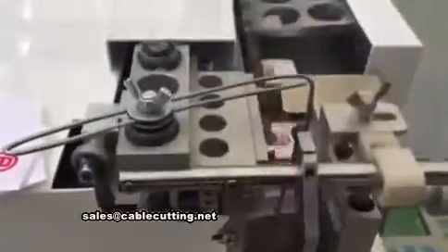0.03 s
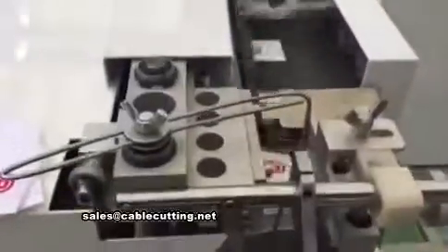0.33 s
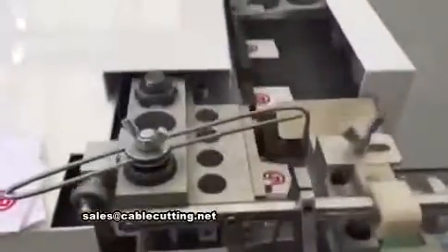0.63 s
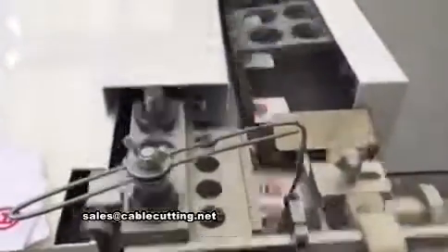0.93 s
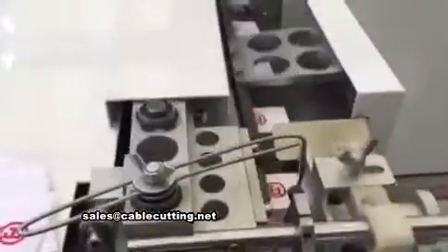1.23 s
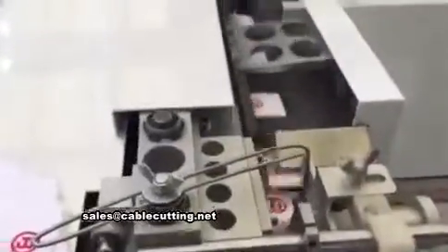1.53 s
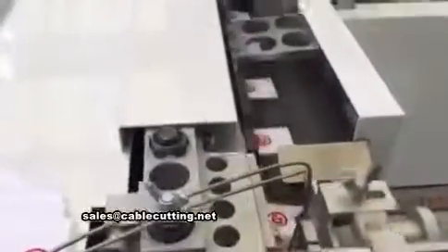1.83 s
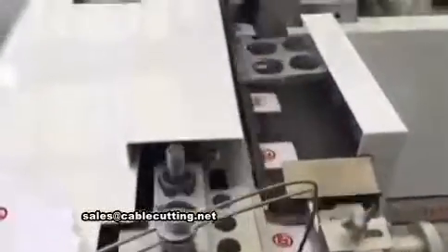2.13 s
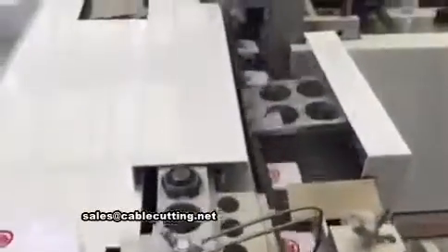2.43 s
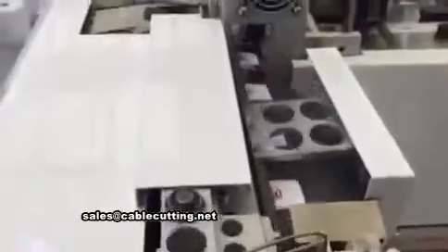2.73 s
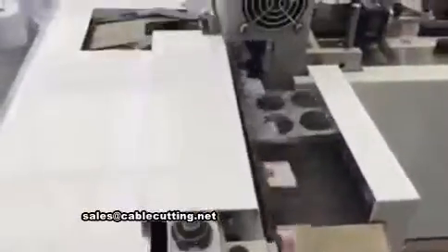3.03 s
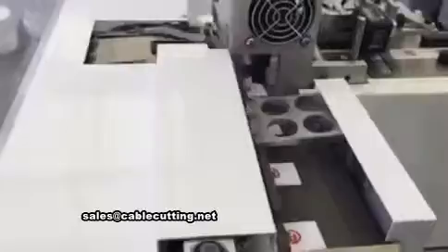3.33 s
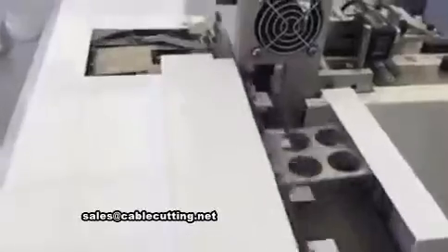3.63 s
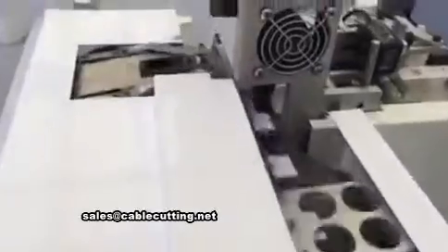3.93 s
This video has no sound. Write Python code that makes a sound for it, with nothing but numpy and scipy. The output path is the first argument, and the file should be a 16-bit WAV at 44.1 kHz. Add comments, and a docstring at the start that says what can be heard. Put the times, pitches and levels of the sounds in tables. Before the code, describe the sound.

Close to the microphone in a workshop, the motors of a label cutting and folding machine buzz and chatter unevenly over a soft fan. Moving parts knock, clack and scrape throughout, and one ringing steel clink comes late.

```python
"""The buzzing motors of a label cutting and folding machine, close up, swell in quick uneven surges.
Two motor tones beat against each other while loose metal rattles and chatters along with them.
Strokes thud and knock on the frame, cutter and folder clack, sliding parts and ribbon scrape, links tick.
Late on, a metal part pings faintly, then steel clinks on steel and rings on.
A fan rushes underneath, and a short workshop tail sits behind the hits."""
import sys
import numpy as np
from scipy import signal
from scipy.fft import rfft, irfft
from scipy.io import wavfile
from scipy.ndimage import uniform_filter1d

SR = 44100
rng = np.random.default_rng(int(sys.argv[2]) if len(sys.argv) > 2 else 0)


def transcribe(signal):
    """Save signal, clipped to [-1, 1], as a 16-bit WAV file at the path in sys.argv[1]."""
    frames = np.atleast_2d(signal).T
    limited = np.clip(frames, -1, 1)
    pcm = np.round(limited * 32767).astype(np.int16)
    wavfile.write(sys.argv[1], SR, pcm)


N = 176400
T = np.arange(N) / SR

# Table levels are relative: each layer's gains apply on top.
# motor surges (centre [s], length [s], fundamental level [dB], overtone level [dB])
MOTOR_SURGES = [(0.008, 0.021, -21, -15.5), (0.072, 0.06, -23, -15.5), (0.093, 0.0055, -17, -6.5),
                (0.114, 0.014, -20, -10), (0.172, 0.074, -19, -17.5), (0.243, 0.038, -20.5, -20),
                (0.273, 0.051, -14.5, -20.5), (0.304, 0.0092, -9, -13), (0.318, 0.013, -9, -13),
                (0.364, 0.054, -9.5, -18), (0.435, 0.085, -12.5, -17), (0.498, 0.064, -15.5, -23),
                (0.499, 0.012, -22, -17), (0.556, 0.012, -12.5, -28), (0.59, 0.075, -14, -22.5),
                (0.697, 0.022, -10.5, -36), (0.701, 0.12, -20, -24), (0.758, 0.061, -13.5, -33),
                (0.826, 0.068, -15.5, -19), (0.885, 0.058, -18.5, -39), (0.974, 0.07, -12, -23),
                (1.047, 0.043, -15.5, -25.5), (1.109, 0.054, -22, -16), (1.124, 0.01, -9, -28),
                (1.164, 0.016, -19.5, -20), (1.206, 0.08, -22, -19), (1.294, 0.055, -19, -28.5),
                (1.37, 0.053, -13.5, -24), (1.446, 0.07, -15.5, -24.5), (1.503, 0.027, -21, -17.5),
                (1.57, 0.083, -15.5, -16.5), (1.65, 0.015, -13, -16), (1.685, 0.046, -11, -22),
                (1.725, 0.016, -16, -16.5), (1.85, 0.017, -16, -18), (1.901, 0.018, -13, -14.5),
                (1.906, 0.071, -20, -21.5), (1.971, 0.04, -34, -16), (2.04, 0.021, -9.5, -13.5),
                (2.064, 0.064, -11.5, -24), (2.088, 0.016, -8, -32), (2.132, 0.075, -16, -31),
                (2.137, 0.011, -25, -15.5), (2.231, 0.033, -15, -19.5), (2.289, 0.071, -21.5, -27),
                (2.319, 0.025, -16, -10.5), (2.425, 0.025, -24, -13), (2.476, 0.0092, -16.5, -20),
                (2.515, 0.054, -18.5, -21.5), (2.603, 0.056, -15.5, -13.5), (2.659, 0.0096, -14.5, -23),
                (2.7, 0.034, -18, -15.5), (2.74, 0.011, -12.5, -19), (2.847, 0.067, -7, -14),
                (2.913, 0.055, -13, -15.5), (2.973, 0.079, -7.5, -15.5), (3.046, 0.047, -15, -19),
                (3.098, 0.056, -19, -22.5), (3.178, 0.059, -15, -20), (3.225, 0.061, -11.5, -16.5),
                (3.29, 0.071, -20, -20.5), (3.354, 0.044, -13, -16), (3.481, 0.013, -18, -15),
                (3.576, 0.011, -23, -11.5), (3.611, 0.039, -11.5, -19), (3.772, 0.034, -19.5, -18),
                (3.812, 0.033, -11.5, -19), (3.877, 0.052, -19.5, -19.5), (3.967, 0.011, -15, -8.5)]
# main motor's harmonics, from the second up (level [dB])
MAIN_OVERTONES = [-2.5, -6.5, -11.5, -15, -22.5, -24.5, -27]
# second motor's harmonics, from the second up (level [dB])
SECOND_OVERTONES = [-7.5, -16, -20.5]
# tone colour of the loose metal's chatter (frequency [Hz], level [dB])
CHATTER_SPECTRUM = [(130, 3), (300, -11), (550, 9), (750, -8.5), (1080, -1), (1330, -14), (1620, -1.5),
                    (2000, -15), (3200, -14.5), (4600, -22.5), (9000, -30), (15000, -46)]
# thuds of the moving parts (centre [s], length [s], level [dB])
STROKE_THUDS = [(0.03, 0.04, -20.5), (0.15, 0.11, -21.5), (0.327, 0.1, -23.5), (0.414, 0.11, -22),
                (0.498, 0.15, -26.5), (0.584, 0.26, -31), (0.73, 0.051, -24), (0.785, 0.077, -25),
                (0.894, 0.058, -29.5), (0.965, 0.042, -25.5), (1.19, 0.14, -26), (1.28, 0.12, -27),
                (1.478, 0.036, -21.5), (1.575, 0.12, -22.5), (1.692, 0.051, -22.5), (1.846, 0.022, -20),
                (1.894, 0.056, -28), (1.962, 0.076, -27), (2.036, 0.0097, -26), (2.09, 0.025, -23),
                (2.232, 0.039, -23), (2.614, 0.07, -31), (2.714, 0.053, -25), (2.829, 0.14, -29),
                (3.012, 0.066, -21), (3.11, 0.04, -24.5), (3.316, 0.021, -25.5), (3.612, 0.041, -21.5),
                (3.777, 0.034, -16), (3.821, 0.056, -28.5), (3.879, 0.036, -22)]
# bassy colour of a thud (frequency [Hz], level [dB])
THUD_SPECTRUM = [(22, -42), (40, -10.5), (68, 3), (100, -5), (150, -14), (250, -13.5), (400, -17),
                 (1500, -49)]
# heavy knocks on the frame (time [s], level [dB])
FRAME_KNOCKS = [(0.003, -5.5), (0.053, -12), (0.078, -17), (0.298, -12), (0.343, -17), (0.773, -15.5),
                (1.092, -20), (1.243, -16), (2.999, -14), (3.087, -15), (3.385, -16), (3.771, -21.5)]
# low modes of the frame (frequency [Hz], level [dB], T60 [s])
FRAME_MODES = [(71, 0, .15), (98, -5, .1), (170, -11, .05)]
# clacks of the cutter and folder (time [s], body level [dB], top level [dB])
CUTTER_CLACKS = [(0.001, -14.5, -15), (0.07, -14.5, -26), (0.0927, -35, -32), (0.162, -17.5, -31),
                 (0.188, -24, -31), (0.5479, -19.5, -26), (0.865, -22, -28), (0.8915, -15, -23),
                 (1.4501, -16.5, -25), (1.6851, -17, -18.5), (3.024, -15.5, -23), (3.043, -18.5, -23),
                 (3.2163, -18.5, -20), (3.3955, -18, -17), (3.8575, -16, -22.5)]
# short scrapes (centre [s], length [s], body level [dB], top level [dB])
SLIDE_SCRAPES = [(0.02, 0.013, -13.5, -19), (0.038, 0.018, -17.5, -25), (0.113, 0.06, -29, -39),
                 (0.33, 0.021, -19, -28), (0.376, 0.021, -20, -30), (0.404, 0.014, -21.5, -25),
                 (0.404, 0.035, -25.5, -47), (0.508, 0.012, -22, -31), (0.678, 0.018, -20.5, -25),
                 (0.707, 0.038, -23.5, -28.5), (0.762, 0.014, -19, -26), (0.783, 0.04, -22.5, -31),
                 (0.84, 0.018, -24.5, -27.5), (1.074, 0.034, -24, -28.5), (1.143, 0.055, -23.5, -30.5),
                 (1.215, 0.048, -29, -47), (1.28, 0.015, -24, -31), (1.924, 0.047, -23, -27),
                 (1.939, 0.028, -24.5, -28), (2.229, 0.01, -27, -40), (2.615, 0.012, -25, -27),
                 (2.96, 0.064, -25.5, -32), (3.231, 0.016, -24.5, -25), (3.322, 0.045, -22.5, -28.5),
                 (3.867, 0.018, -27, -42)]
# midrange body of scrapes, clacks and ticks (frequency [Hz], level [dB])
BODY_SPECTRUM = [(300, -25), (900, 5), (2000, 4.5), (3300, 1.5), (5000, -4), (6500, -4), (9000, -19),
                 (15000, -20)]
# their bright top end (frequency [Hz], level [dB])
TOP_SPECTRUM = [(300, -44), (4500, -17), (7500, -3), (9300, 4), (10500, -6), (12000, -0.5), (15000, -6.5)]
# ringing modes of the steel part (frequency [Hz], level [dB], T60 [s])
STEEL_MODES = [(2681, -11, .3), (3612, -12, .4), (3652, -8, .9), (4707, -13, .7), (4734, -7, 1.25),
               (4818, -17, 1), (5577, -8.5, .45), (5640, -6.5, 1.2), (5689, -12, .8), (6869, -12, .45),
               (6912, -12, .9), (8390, -16, .35), (8712, -10.5, 1.1), (11410, -9, .3), (11600, -10, .35),
               (12040, -13, .3)]
# bright crack that opens the clink (frequency [Hz], level [dB])
CRACK_SPECTRUM = [(1000, -1), (2500, 0), (4500, 4), (5500, 3), (7500, -5), (8600, 2), (10300, -21),
                  (11400, 5), (12700, -6), (15000, -11)]
# modes of the lightly touched part (frequency [Hz], level [dB])
PING_MODES = [(3677, -38), (6950, -43), (8355, -44)]
# colour of the fan's air (frequency [Hz], level [dB])
FAN_SPECTRUM = [(20, 3), (70, 3.5), (300, -2.5), (1100, 3.5), (2400, -3), (5000, -14), (8000, -17),
                (10500, -20.5), (15000, -21.5)]
# fader ride on the fan's air (time [s], level [dB])
FAN_RIDE = [(0, -30), (2.3, -29.5), (2.9, -29), (4, -28.5)]

TOP_DB = -6.5  # top-end trim on scrapes and clacks


def buzz():
    """Two motor tones beat and swell in surges; loose metal rattles with them and adds overtones."""
    main_hz, second_hz, rattle_hz, flutter_hz = 545, 533.6, 48, 70.5
    # between surges the buzz settles to an idle floor
    tone_env = np.hypot(swells(MOTOR_SURGES, column=2, edge=2.85), amp(-35))
    over_env = np.hypot(swells(MOTOR_SURGES, column=3, edge=2.85), amp(-31.5))
    upper_env = over_env ** 0.9 * amp(-32) ** 0.1  # higher overtones swell less
    main, second = motor_phase(main_hz), motor_phase(second_hz)
    rattle = np.cos(2 * np.pi * rattle_hz * T + 2 * waver(22))
    tone = amp(-1) * tone_env * unit(1 + .2 * rattle) * np.cos(main + .25 * waver(79))
    overtones = np.zeros(N)
    for phase, levels in ((main, MAIN_OVERTONES), (second, SECOND_OVERTONES)):
        for k, db in enumerate(levels, 2):
            gain = amp(db) * (over_env if k < 4 else upper_env) * flutter(2.7, flutter_hz)
            overtones += gain * np.cos(k * phase + 2 * np.pi * rng.random() + .25 * waver(64))
    chatter_env = amp(-6) * np.hypot(over_env, 0.41 * tone_env)
    chatter = chatter_env * noise(CHATTER_SPECTRUM) * unit(1 + 0.44 * np.cos(main))
    rasp = unit(1 + .27 * rattle) * (overtones + chatter)
    return flutter(1.5, flutter_hz) * (tone + rasp)


def motor_phase(hz):
    """A motor's running phase, with slow pitch drift and fast jitter."""
    cycles = np.cumsum(hz * (1 + .0015 * waver(6.16))) / SR
    return 2 * np.pi * (cycles + .009 * waver(105))


def thuds():
    """Each stroke shakes the frame with a dull, even-bodied rumble."""
    rumble = noise(THUD_SPECTRUM)
    levelled = unit(rumble / np.sqrt(uniform_filter1d(rumble ** 2, size=900) + 0.031))
    return swells(STROKE_THUDS, column=2, edge=1.6) * levelled * flutter(2.6, 31)


def knocks(attack_s=.006):
    """A heavy part lands and the frame booms briefly in its lowest modes."""
    out = np.zeros(N)
    for start, level_db in FRAME_KNOCKS:
        t = np.maximum(T - start, 0)
        boom = sum(amp(db - 60 * t / t60) * np.sin(2 * np.pi * hz * rng.uniform(.9, 1.1) * t)
                   for hz, db, t60 in FRAME_MODES)
        out += amp(level_db) * np.minimum(t / attack_s, 1) * boom
    return out


def clacks(t60_s=0.031):
    """Metal meets metal and stops dead: an instant attack and a very tight decay."""
    body, top = noise(BODY_SPECTRUM), noise(TOP_SPECTRUM)
    out = np.zeros(N)
    for start, body_db, top_db in CUTTER_CLACKS:
        after = slice(int(start * SR), None)
        decay = amp(-60 * (T[after] - start) / t60_s)
        out[after] += decay * (amp(body_db) * body[after] + amp(top_db + TOP_DB) * top[after])
    return out


def scrapes(slips_per_s=260):
    """Sliding parts and ribbon catch and slip: short, gritty scrapes made of crowded ticks."""
    slips = tails(rng.random(N) < slips_per_s / SR, decay_s=0.0009)
    body = amp(1) * swells(SLIDE_SCRAPES, column=2, edge=2.16) * noise(BODY_SPECTRUM)
    top = amp(TOP_DB) * swells(SLIDE_SCRAPES, column=3, edge=6.2) * noise(TOP_SPECTRUM)
    return (body + top) * flutter(-2.5, 500) * unit(1 + 2.6 * slips)


def clink(start_s=3.364, beat_hz=8.9, bite_t60_s=.13, crack_t60_s=.1):
    """Steel strikes steel: a crack, a loud bite that soon dies, then modes beating with their twins."""
    t = np.maximum(T - start_s, 0)
    ring = np.zeros(N)
    for hz, db, t60 in STEEL_MODES:
        shimmer = amp(db - 60 * t / t60) * flutter(2, 81)
        ring += shimmer * np.sin(2 * np.pi * (hz * t + rng.random()) + .25 * waver(64))
    beating = 1 + .45 * np.cos(2 * np.pi * beat_hz * t)
    bite = 1 + amp(6.5 - 60 * t / bite_t60_s)
    crack = noise(CRACK_SPECTRUM) * amp(14 - 60 * t / crack_t60_s)
    attack = np.minimum(t / 0.00084, 1)
    return amp(-24.5) * attack * (ring * beating * bite + crack)


def ping(start_s=2.706, t60_s=.7):
    """A lightly touched metal part rings faintly."""
    t = np.maximum(T - start_s, 0)
    return sum(amp(db - 60 * t / t60_s) * np.sin(2 * np.pi * hz * t) for hz, db in PING_MODES)


def ticks(ticks_per_s=26):
    """Small links tick at random behind the louder strokes."""
    accents = amp(3.5 * np.minimum(rng.exponential(1, N), 3))
    triggers = rng.random(N) < ticks_per_s / SR
    envelope = tails(accents * triggers, decay_s=0.0018)
    return amp(-36) * envelope * (noise(BODY_SPECTRUM) + 0.36 * noise(TOP_SPECTRUM))


def fan(blade_hz=790.5):
    """A steady bed of rushing air with a faint blade tone."""
    rush = amp(np.interp(T, *np.transpose(FAN_RIDE))) * noise(FAN_SPECTRUM) * flutter(0.93, 82)
    blade = unit(np.cos(2 * np.pi * blade_hz * T + .5 * waver(5.5)))
    return rush + amp(-42) * blade


def room(x, t60_s=0.21, predelay_s=.005):
    """A short, diffuse workshop tail."""
    t = T[:SR // 2]
    tail = rng.standard_normal(len(t)) * amp(-60 * t / t60_s) * (t > predelay_s)
    return signal.fftconvolve(x, tail / np.linalg.norm(tail))[:N]


def amp(db):
    """Decibels to gain."""
    return 10 ** (np.asarray(db) / 20)


def unit(x):
    """Scales to an rms of one."""
    return x / np.sqrt(np.mean(x ** 2) + 1e-20)


def noise(spectrum):
    """Noise of rms one, coloured by the given spectrum."""
    hz, db = np.transpose(spectrum)
    f = np.fft.rfftfreq(N, 1 / SR)
    eq = amp(np.interp(np.log(f + 1), np.log(hz), db)) * f / (f + 10)
    return unit(irfft(rfft(rng.standard_normal(N)) * eq, N))


def waver(rate_hz):
    """Smooth random motion of rms one, rolling off around the given rate."""
    f = np.fft.rfftfreq(N, 1 / SR)
    return unit(irfft(rfft(rng.standard_normal(N)) * np.exp(-(f / rate_hz) ** 2), N))


def flutter(depth_db, rate_hz):
    """A random tremolo of mean power one."""
    return unit(amp(depth_db * waver(rate_hz)))


def swells(table, column, edge):
    """Envelope of swells at the levels in the given column; a higher edge makes them squarer."""
    power = np.zeros(N)
    for row in table:
        centre, length = row[:2]
        near = slice(max(int((centre - 2 * length) * SR), 0), int((centre + 2 * length) * SR))
        power[near] += amp(row[column]) ** 2 * np.exp(-2 * abs(2 * (T[near] - centre) / length) ** edge)
    return np.sqrt(power)


def tails(triggers, decay_s):
    """Gives each trigger an exponential release."""
    return signal.lfilter([1], [1, -np.exp(-1 / (decay_s * SR))], 1. * triggers)


def scene():
    """The mix: dry motors up front, hits with a touch of room, the fan underneath."""
    hits = thuds() + knocks() + scrapes() + clacks() + ticks() + clink() + ping()
    return (buzz() + hits + amp(-19.5) * room(hits) + fan())[None]


def record(dry):
    """The microphone drops the deepest bass, soft overload rounds the peaks, a high cut trims the air."""
    low_cut_hz, high_cut_hz, ceiling = 35, 15080, .64
    trimmed = signal.sosfilt(signal.butter(2, low_cut_hz, "high", fs=SR, output="sos"), dry)
    rounded = trimmed / (1 + (trimmed / ceiling) ** 6) ** (1 / 6)
    high_cut = signal.firwin(401, high_cut_hz, window=("kaiser", 9), fs=SR)
    return signal.oaconvolve(rounded, high_cut[None], "same")


dry = scene()
out = record(dry)
transcribe(out)
```